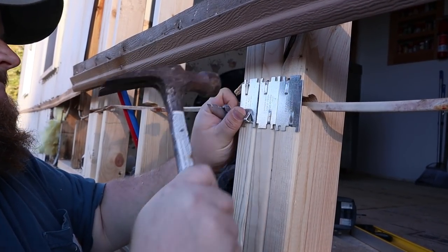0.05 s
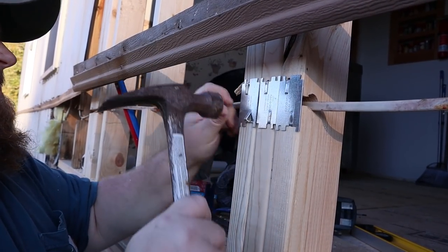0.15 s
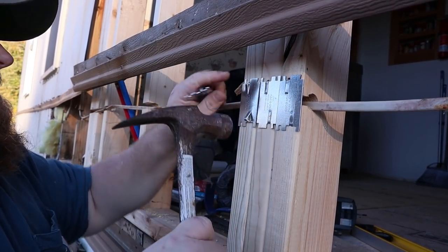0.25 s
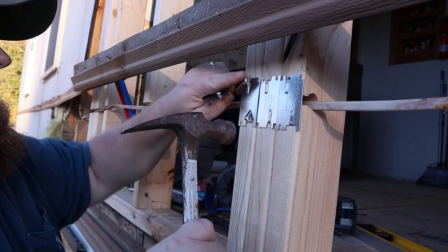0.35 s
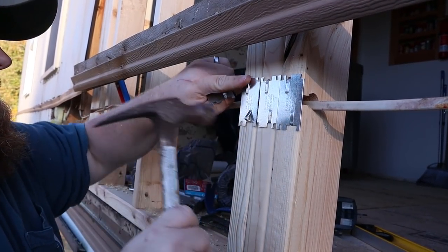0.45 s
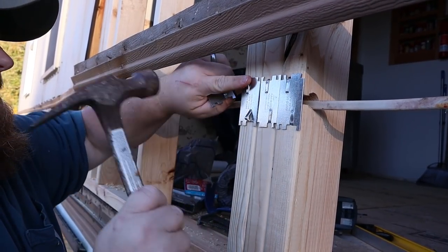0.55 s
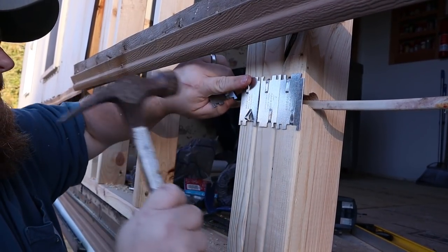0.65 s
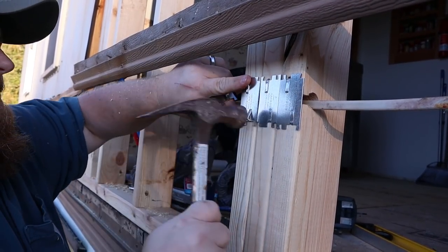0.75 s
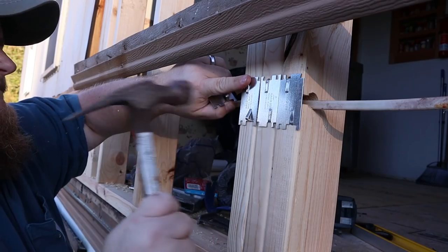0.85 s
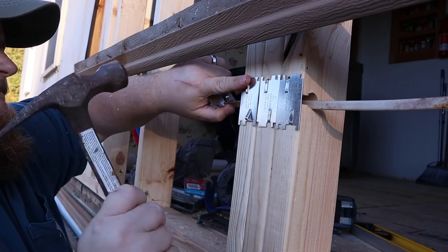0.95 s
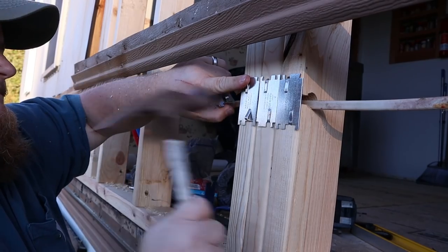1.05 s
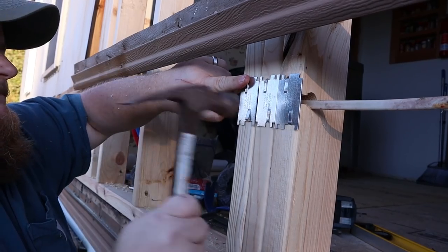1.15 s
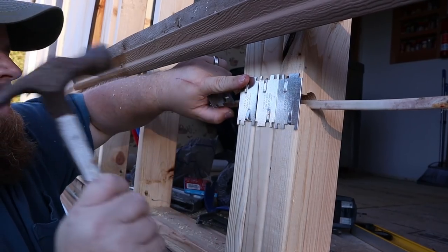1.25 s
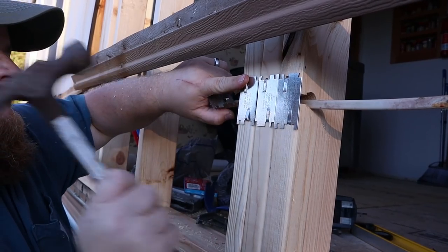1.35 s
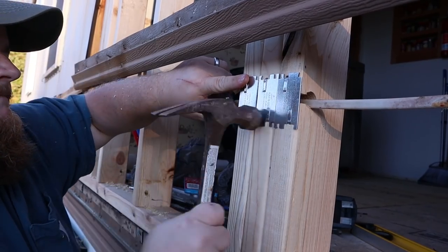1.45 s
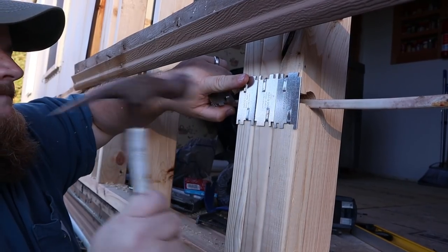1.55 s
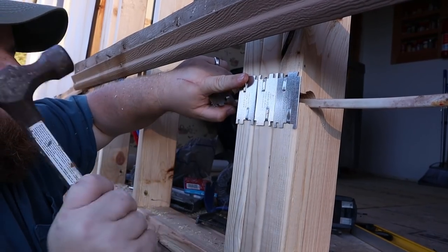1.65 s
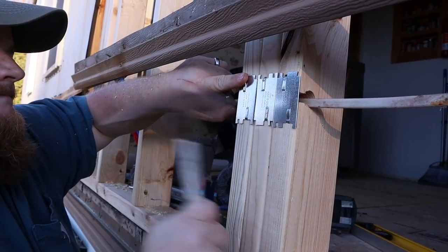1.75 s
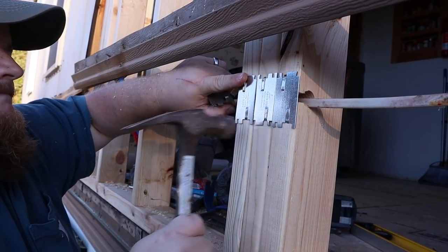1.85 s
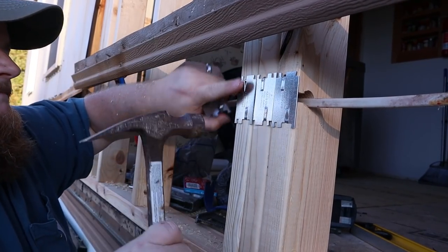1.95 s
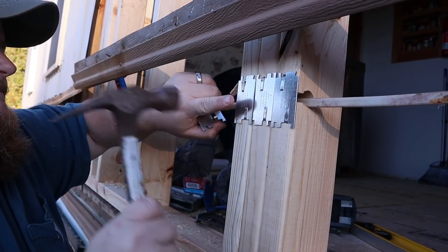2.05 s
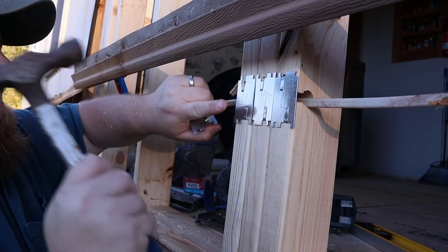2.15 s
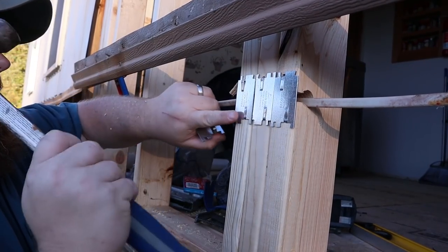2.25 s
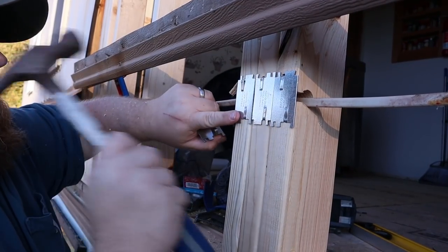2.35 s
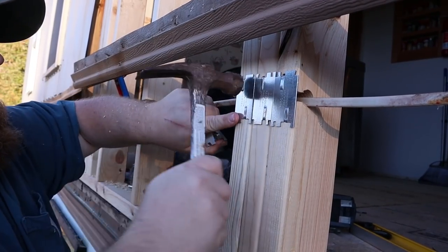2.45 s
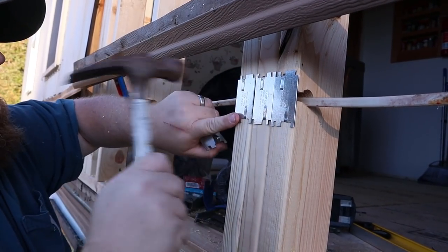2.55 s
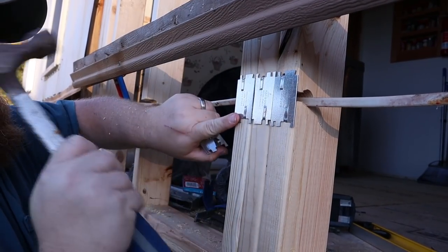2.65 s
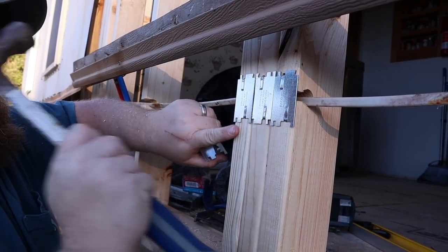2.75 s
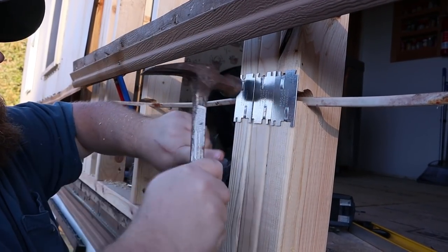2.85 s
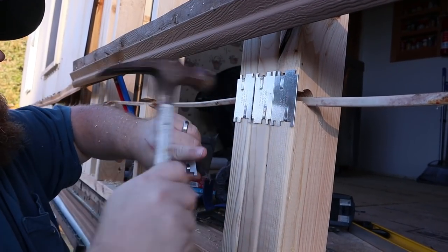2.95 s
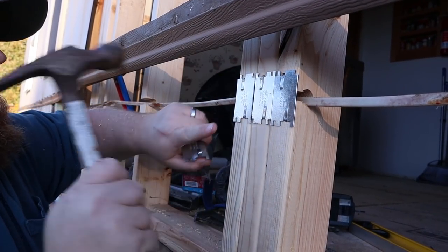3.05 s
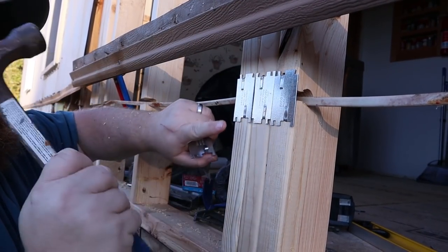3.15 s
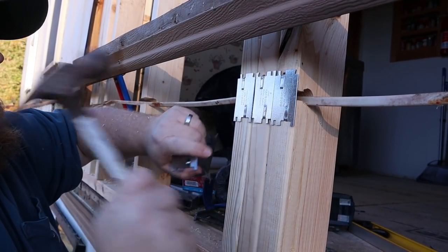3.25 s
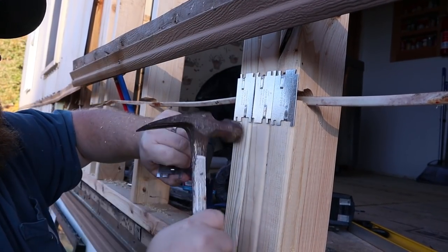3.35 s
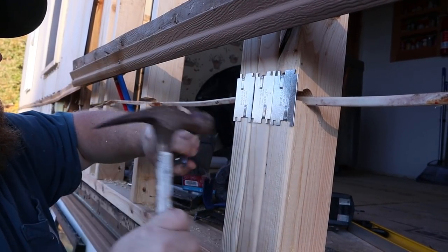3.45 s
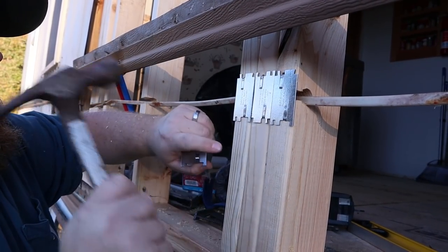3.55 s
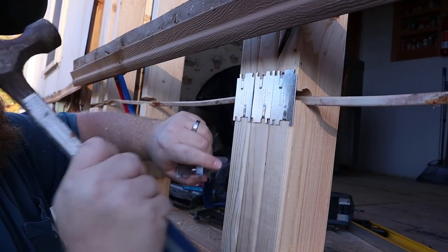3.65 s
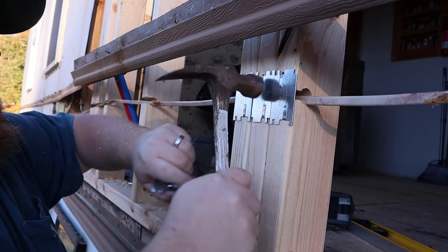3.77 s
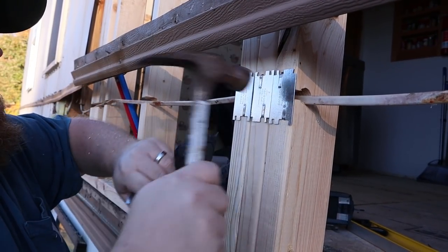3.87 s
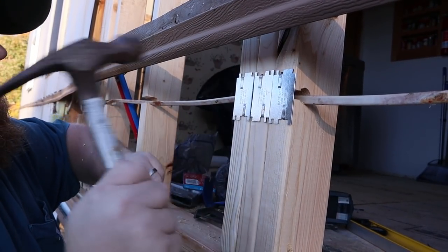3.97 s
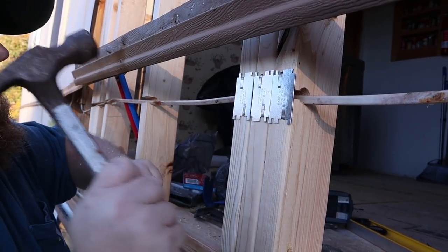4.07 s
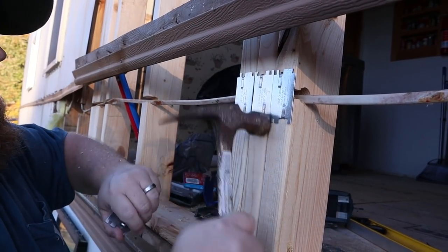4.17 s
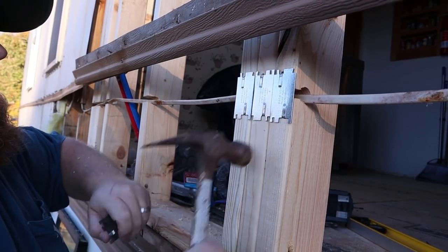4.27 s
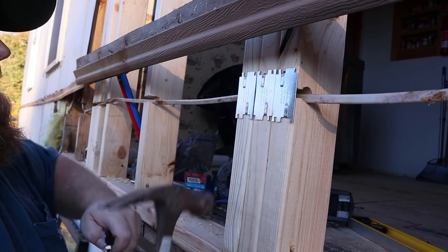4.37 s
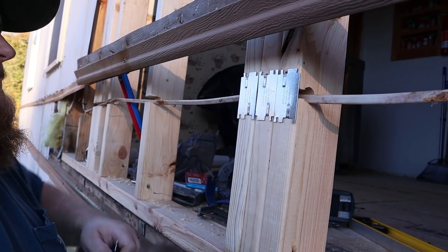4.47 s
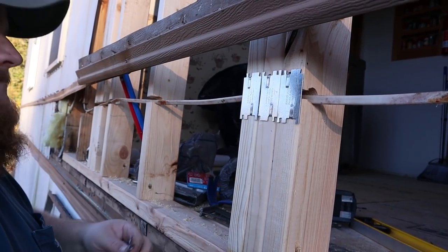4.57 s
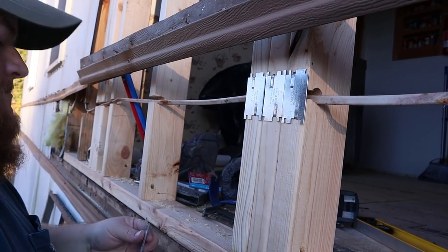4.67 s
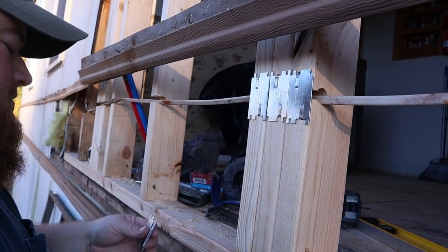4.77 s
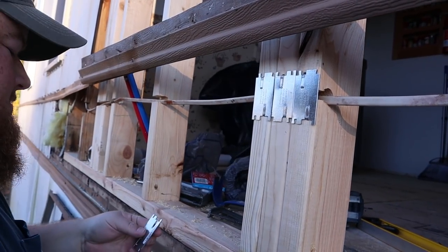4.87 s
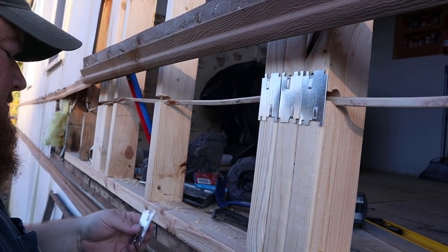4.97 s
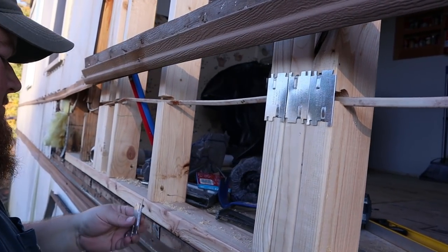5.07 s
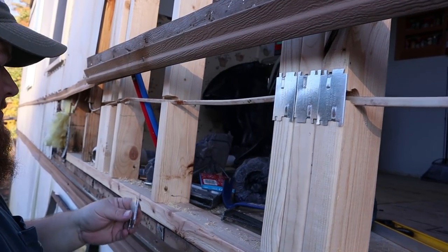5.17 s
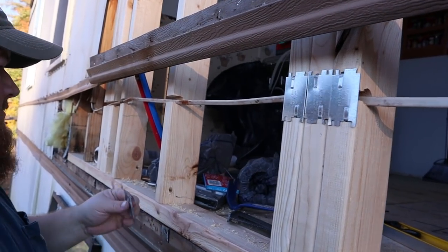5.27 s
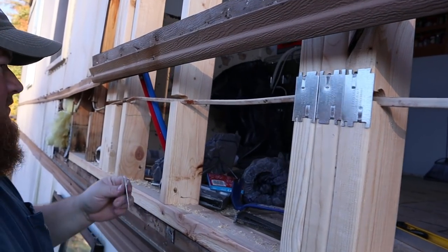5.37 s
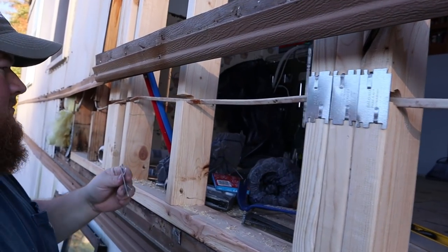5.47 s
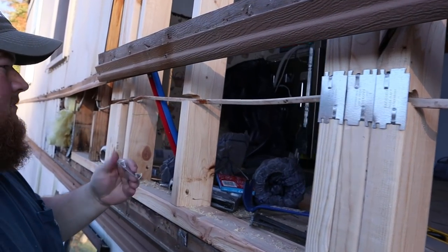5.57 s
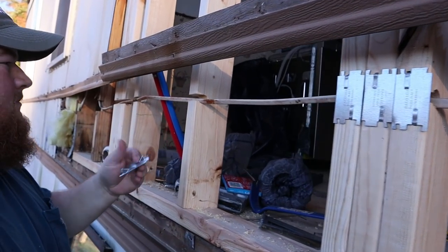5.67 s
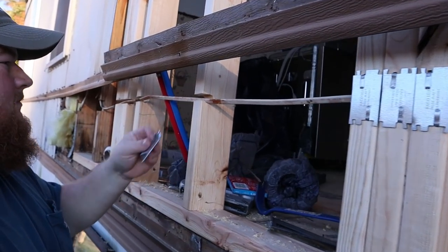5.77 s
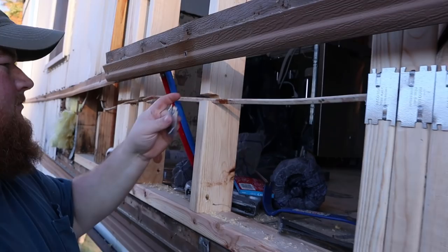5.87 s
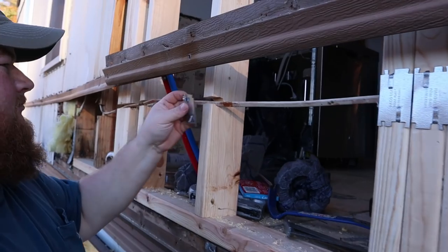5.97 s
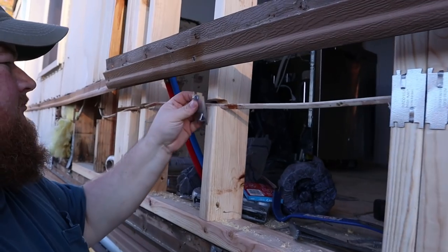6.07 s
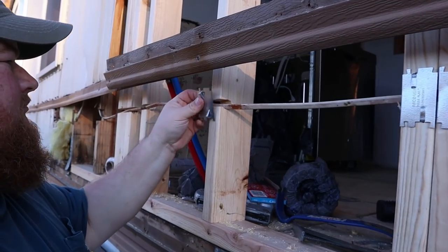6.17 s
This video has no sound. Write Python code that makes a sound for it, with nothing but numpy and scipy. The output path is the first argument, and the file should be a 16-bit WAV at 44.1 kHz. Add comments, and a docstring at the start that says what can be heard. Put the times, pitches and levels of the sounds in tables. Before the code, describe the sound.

Sharp hammer blows on a metal plate ring through a timber wall, with an insect-like chirr between them and faint handling afterwards.

```python
"""From the first instant a claw hammer drives a steel nail plate into a stud of an open timber wall.
Each of ten blows cracks, knocks the stud and sets the wall booming; the room answers.
The camera clips and ducks on each, so the echo swells as the gain comes back.
Between blows an insect-like chirr comes from outside. The last blow lands at 4.3 s.
Then spare plates click and slide in the hand, the camera rustles and air nudges the microphone."""
import sys
import numpy as np
from scipy import signal
from scipy.fft import rfft, irfft, next_fast_len
from scipy.io import wavfile
from scipy.ndimage import uniform_filter1d, minimum_filter1d, map_coordinates

SR = 44100
rng = np.random.default_rng(int(sys.argv[2]) if len(sys.argv) > 2 else 0)


def dump_mix(stems):
    """Bounce the given channels to the path in sys.argv[1] as a 16-bit WAV at rate SR."""
    frames = np.atleast_2d(stems).T  # one column per channel
    limited = np.clip(frames, -1, 1)  # hard clip at full scale
    pcm = np.round(limited * 32767).astype(np.int16)
    wavfile.write(sys.argv[1], SR, pcm)


N = 274302

# Noise spectra. Each row: frequency in Hz, relative density in dB.
AIR_SPECTRUM = [(15, 5), (25, 1.5), (277, -4.5), (317, 1), (394, -5), (607, -6.5), (677, -6), (775, -9.5),
                (1560, -13.5), (1840, -14), (2610, -18), (4610, -22), (16000, -33)]
RUMBLE_SPECTRUM = [(25, -26), (70, -3), (140, 6), (300, -7), (700, -13.5), (3000, -22.5), (7000, -27),
                   (15000, -45)]
RUSTLE_SPECTRUM = [(100, 6), (500, -5), (2000, -5), (5000, -11), (9000, -15), (15000, -31)]
BUFFET_SPECTRUM = [(10, 4), (30, -5), (70, 0), (140, -33), (500, -40), (2000, -88.5)]
CHORUS_SPECTRUM = [(1000, -40.5), (1950, -19.5), (2120, 0), (2260, 0.5), (2450, -5.5), (3200, -19.5),
                   (4600, -22.5), (5300, -25), (6100, -19), (9000, -32.5), (16000, -49.5)]
SCRAPE_SPECTRUM = [(800, -24), (2000, 7), (3200, -3), (4700, 1), (6000, -6), (8500, -12), (11000, -20),
                   (15000, -14)]
TICK_SPECTRUM = [(200, 24), (900, 11), (3000, 8.5), (8000, 5.5), (16000, -9)]
SCUFF_SPECTRUM = [(150, -16), (500, -2), (1500, -12), (2500, -25), (9000, -48.5)]
SLAP_SPECTRUM = [(80, 8), (250, 8), (900, -12), (2000, -8), (8000, -14), (16000, -35)]
ROOM_SPECTRUM = [(50, -25.5), (90, -7), (150, -2), (280, -2.5), (460, 2), (620, 6.5), (1100, -2),
                 (1700, -9), (2250, -12.5), (2900, -13.5), (4200, -21.5), (9200, -21.5), (11000, -32),
                 (16000, -34)]
NEAR_TIMBER_SPECTRUM = [(60, -32.5), (150, -6.5), (280, 5), (450, -13.5), (650, 2.5), (1400, -7),
                        (2200, -15.5), (3000, -19), (4500, -28), (9000, -34), (11000, -42.5), (16000, -41)]
CRACK_SPECTRUM = [(40, -17), (150, -0.5), (400, 6), (1000, 14), (1700, 5.5), (2250, -3.5), (2800, 0),
                  (4200, -8.5), (5500, -1), (8500, -12), (10500, -14.5), (16000, -11.5)]
# Level curves. Each row: time in seconds, relative level in dB.
RUMBLE_LEVELS = [(0, -41.5), (.6, -48.5), (2.4, -49.5), (4.2, -49.5), (4.8, -75), (6.2, -53)]
TRILL_LEVELS = [(0, -52), (.7, -63), (1.3, -57), (2.3, -55.5), (3.3, -54.5), (3.7, -68), (4.2, -62),
                (4.5, -78)]
# Swells of noise. Each row: start in seconds, length in seconds, relative level in dB.
CAMERA_RUSTLES = [(5.1, 1.8, -48.5)]
AIR_PUFFS = [(5.5, 0.21, -46), (5.8, 0.16, -48.5), (6.0, .3, -44.5)]
PLATE_SLIDES = [(4.92, 0.4, -57.5), (5.4, 0.9, -71), (5.93, 0.81, -56.5)]
# Loud runs of the chirr. Each row: start in seconds, pulse count, relative level in dB.
CHIRR_BURSTS = [(.314, 2, -33), (.428, 1, -36), (.514, 2, -41), (1.058, 4, -40), (1.415, 4, -35),
                (1.738, 2, -40), (1.830, 2, -31), (2.076, 6, -32), (2.281, 3, -37), (2.728, 1, -34),
                (2.788, 4, -31.5), (3.156, 3, -32), (3.246, 3, -32.5), (3.657, 1, -36), (3.779, 1, -39),
                (4.1715, 2, -39)]
# Plate clicks: the struck plate settling just after the first blow, spare plates touching later. Each row:
# start in seconds, relative tick and ring levels in dB, pitch in Hz.
PLATE_CLICKS = [(0.028, -33, -9, 2540), (0.138, -37, -20.5, 1280), (0.184, -44, -22, 1290),
                (2.249, -41, -47, 3020), (2.818, -34, -35.5, 5000), (4.884, -33.5, -40, 2500),
                (4.892, -49, -41, 2940), (5.700, -37.5, -32, 1650), (5.935, -35, -44, 2240),
                (6.153, -35, -44, 1870)]
# Bumps on timber. Each row: start in seconds, relative level in dB, tilt in dB per octave.
BOARD_BUMPS = [(2.228, -32, -4.5), (4.884, -35.5, 1), (5.838, -28, 10), (5.853, -27, 12),
               (6.156, -28.5, -4)]
# Resonances. Each row: frequency in Hz, relative level in dB, T60 in seconds.
SPARE_PLATE_MODES = [(4700, -2, 0.11), (7500, 1, .14), (8350, 1, 0.16), (9900, -5, 0.11), (12700, 2, .08),
                     (14200, -6, .06)]
BOARD_MODES = [(419, -3.5, 0.11), (642, -1.5, 0.023), (960, -2, 0.053), (1260, -12.5, 0.046),
               (1575, -14, .13)]
WALL_MODES = [(84, -11, 0.44), (104.8, -22, 0.9), (122.4, -5, 0.41), (132, -17, 0.14), (146.3, -4, 0.48),
              (186.9, -7, 0.32), (192.8, 0.5, 0.19), (222, -7, 0.12), (260.7, -17, 0.1), (275.2, 3.5, 0.19),
              (308, -7, 0.29), (368.4, -8.5, 0.38), (429, -16, 0.19), (562, -11, .42)]
STUD_MODES = [(127, -7, 0.065), (177, 0, 0.076), (252.5, -4.5, 0.13), (305.8, -4, 0.098), (403, -10, 0.13),
              (556, 0, 0.058), (742, 2.5, 0.012), (826, -1, 0.045), (1017, 0.5, 0.047), (1485, 2.5, 0.015),
              (2610, -24.5, .02), (3604, -2, 0.018), (5890, -17, 0.028), (8610, -4, .018)]
# Room decay. Each row: frequency in Hz, T60 in seconds.
ROOM_T60 = [(120, 0.66), (400, 0.3), (1200, 0.38), (4000, 0.39), (9000, 0.33), (15000, 0.24)]
# Blow colour with the plate loose, biting and driven home. Each row: frequency in Hz, gain in dB.
LOOSE_EQ = [(190, -5.5), (330, -15.5), (560, -14.5), (830, -18), (1300, -17), (3000, -3.5), (4600, -7)]
BITING_EQ = [(190, -3), (330, -2), (560, -6.5), (830, -8.5), (1300, -6.5), (3000, -6.5), (4600, -2.5)]
HOME_EQ = [(190, -9), (330, -6.5), (560, -8), (830, -3.5), (1300, -4.5), (3000, -8.5), (4600, -4.5)]
# Each row: start in seconds, force in dB, plate seating from 0 to 1, ping in Hz, relative ping in dB.
HAMMER_BLOWS = [(-.011, -1.5, 0.47, 3600, 11), (0.8409, 0, 0, 3740, 7.5), (1.1935, .5, 0.13, 3630, 0.5),
                (1.547, -0.5, 0.4, 2790, 10.5), (1.8826, 1.5, 0.41, 2900, -8), (2.5343, -1, .48, 3070, 9.5),
                (2.9605, .5, .55, 4680, 11), (3.4284, -1.5, 0.54, 2650, 8), (3.8802, 0, 0.79, 2735, 10),
                (4.2837, -0.5, 1, 4750, 2.5)]


def amp(db):
    """Decibels to gain."""
    return 10 ** (np.asarray(db) / 20)


def at_hz(points, hz):
    """Interpolate (Hz, value) points on a log axis."""
    knots_hz, values = np.transpose(points)
    return np.interp(np.log(hz + 1), np.log(knots_hz + 1), values)


def level_curve(points):
    """Interpolate (s, dB) points to dB per sample."""
    return np.interp(np.arange(N) / SR, *np.transpose(points))


def swells(rows):
    """Gain per sample of half-sine swells."""
    t = np.arange(N) / SR
    return sum(amp(db) * np.sin(np.pi * np.clip((t - start_s) / length_s, 0, 1))
               for start_s, length_s, db in rows)


def wobble(rate_hz):
    """Smooth random curve through unit-variance knots."""
    knots = rng.standard_normal(int(N * rate_hz / SR) + 4)
    return map_coordinates(knots, [np.arange(N) * rate_hz / SR])


def fade(t, t60_s):
    """Exponential decay, 60 dB down at t60_s."""
    return np.exp(-np.log(1000) * t / t60_s)


def rise(t, tau_s):
    """Exponential onset from 0 to 1."""
    return 1 - np.exp(-t / tau_s)


def coloured(x, points):
    """Minimum-phase filter through (Hz, dB) points, by folded cepstrum."""
    size = 2 * next_fast_len(len(x) // 2 + 4096)
    gain = amp(at_hz(points, np.fft.rfftfreq(size, 1 / SR)))
    cepstrum = irfft(np.log(gain))
    cepstrum[1:size // 2] *= 2
    cepstrum[size // 2 + 1:] = 0
    return irfft(rfft(x, size) * np.exp(rfft(cepstrum)), size)[:len(x)]


def noise(spectrum, size):
    """Coloured noise, rms 1."""
    x = coloured(rng.standard_normal(size), spectrum)
    return x / np.sqrt(np.mean(x ** 2) + 1e-20)


def ring(modes, t, scatter_db, detune):
    """Damped modes of alternating sign; level and pitch scatter per strike."""
    out = np.zeros(len(t))
    for k, (hz, db, t60_s) in enumerate(modes):
        level_draw, pitch_draw = rng.standard_normal(2)
        tone = np.sin(2 * np.pi * hz * (1 + detune * pitch_draw) * t)
        out += (-1) ** k * amp(db + scatter_db * level_draw) * fade(t, t60_s) * tone
    return out


def add(track, start_s, sound):
    """Mix a sound in, cut to the track's ends."""
    start = round(start_s * SR)
    part = sound[max(-start, 0):max(N - start, 0)]
    track[max(start, 0):][:len(part)] += part


def open_air(level_db=-53):
    """Steady hush of open air."""
    return amp(level_db + 0.39 * wobble(1.7)) * noise(AIR_SPECTRUM, N)


def low_rumble():
    """A low rumble lingers through the hammering, fades after it and returns with the handling."""
    return amp(level_curve(RUMBLE_LEVELS) + wobble(5.5)) * noise(RUMBLE_SPECTRUM, N)


def camera_motion(rustle_db=-2, buffet_db=-2):
    """The carried camera rustles; air buffets its microphone."""
    rustle = swells(CAMERA_RUSTLES) * amp(rustle_db + wobble(36)) * noise(RUSTLE_SPECTRUM, N)
    buffet = swells(AIR_PUFFS) * amp(buffet_db + 3 * wobble(7)) * noise(BUFFET_SPECTRUM, N)
    return rustle + buffet


def chirr_pulse(lower_hz=2270, upper_hz=2650, upper_db=-5, yard_db=-8, gap_s=0.003):
    """Two quick strokes excite two resonances, with faint scatter from the yard; peak 1."""
    t = np.arange(SR // 12) / SR
    strokes = np.zeros(len(t))
    strokes[0] = 1
    strokes[int(abs(gap_s * SR * (1 + 0.1 * rng.standard_normal())))] += 0.7
    strokes += amp(yard_db) / 4 * rng.standard_normal(len(t)) * fade(t, t60_s=0.06)
    tones = np.sin(2 * np.pi * lower_hz * t) + amp(upper_db) * np.sin(2 * np.pi * upper_hz * t)
    pulse = signal.fftconvolve(strokes, tones * t * fade(t, t60_s=0.0058))[:len(t)]
    return pulse / np.abs(pulse).max()


def chirr(rate_hz=34, burst_db=-4, trill_db=6, chorus_db=-2):
    """A thin distant chorus, loud bursts of pulses and a soft trill between them."""
    out = amp(level_curve(TRILL_LEVELS) + chorus_db + wobble(10)) * noise(CHORUS_SPECTRUM, N)
    period_s = 1 / rate_hz
    for start_s, count, db in CHIRR_BURSTS:
        for k in range(count):
            add(out, start_s + k * period_s, amp(db + burst_db) * chirr_pulse())
    for pulse_s in np.cumsum(period_s * (1 + 0.15 * rng.standard_normal(160))):
        in_burst = any(start_s - period_s < pulse_s < start_s + count * period_s
                       for start_s, count, _ in CHIRR_BURSTS)
        if not in_burst:
            db = np.interp(pulse_s, *np.transpose(TRILL_LEVELS))
            add(out, pulse_s, amp(db + trill_db) * chirr_pulse())
    return out


def plate_slides(grain_db=0.5):
    """Thin steel scrapes softly on steel, slightly unevenly."""
    return swells(PLATE_SLIDES) * amp(grain_db * wobble(60)) * noise(SCRAPE_SPECTRUM, N)


def plate_tinkles(level_db=-64, spread_db=2, jitter_s=0.023, count=7):
    """Spare plates touch lightly and ring freely as the hand lifts them."""
    out, t = np.zeros(N), np.arange(SR // 4) / SR
    draws = rng.standard_normal((count, 2))
    for start_s, (time_draw, level_draw) in zip(np.linspace(5.4, 6.2, count), draws):
        tinkle = ring(SPARE_PLATE_MODES, t, scatter_db=2.5, detune=0.02)
        add(out, start_s + jitter_s * time_draw, amp(level_db + spread_db * level_draw) * tinkle)
    return out


def plate_clicks(tick_trim_db=-8, ring_trim_db=-3, ring_t60_s=0.023):
    """Plates meet: a noisy tick and a short two-mode clink."""
    out, t = np.zeros(N), np.arange(SR // 4) / SR
    for start_s, tick_db, ring_db, hz in PLATE_CLICKS:
        tick = noise(TICK_SPECTRUM, len(t)) * fade(t, t60_s=0.11)
        modes = [(hz, 0, ring_t60_s), (hz * 1.89, -3, ring_t60_s / 2)]
        clink = ring(modes, t, scatter_db=5, detune=0.036)
        add(out, start_s, amp(tick_db + tick_trim_db) * tick + amp(ring_db + ring_trim_db) * clink)
    return out


def board_bumps(trim_db=-9, scuff_db=-4):
    """Light bumps scuff and ring a board, each with its own brightness, dull thud to bright knock."""
    out, t = np.zeros(N), np.arange(SR // 4) / SR
    for start_s, bump_db, db_per_octave in BOARD_BUMPS:
        modes = [(hz, db + db_per_octave * np.log2(hz / 800), t60_s) for hz, db, t60_s in BOARD_MODES]
        body = ring(modes, t, scatter_db=2, detune=0.004)
        scuff = amp(scuff_db) * noise(SCUFF_SPECTRUM, len(t)) * fade(t, t60_s=0.21)
        add(out, start_s, amp(bump_db + trim_db) * (body + scuff) * rise(t, tau_s=0.00084))
    return out


def far_wall_slap(level_db=-22, delay_s=0.078, t60_s=0.083):
    """A far wall returns each blow, soft and smeared."""
    out, t = np.zeros(N), np.arange(SR // 4) / SR
    envelope = amp(level_db) * fade(t, t60_s) * rise(t, tau_s=0.0048)
    for start_s, *_ in HAMMER_BLOWS:
        add(out, start_s + delay_s, envelope * noise(SLAP_SPECTRUM, len(t)))
    return out


def room_tail(t):
    """Diffuse room echo: quick build-up, bass lasts longest."""
    hz, frame_s, bins = signal.stft(noise(ROOM_SPECTRUM, len(t)), SR, nperseg=256)
    decay = fade(frame_s, at_hz(ROOM_T60, hz)[:, None])
    _, tail = signal.istft(bins * decay, SR, nperseg=256)
    return tail[:len(t)] * rise(t, tau_s=0.0016)


def blow_colour(seating):
    """(Hz, dB) points: a loose plate clatters, a biting one booms the wall, a seated one clacks."""
    stages = (LOOSE_EQ, BITING_EQ, HOME_EQ)
    colour = [(hz, np.interp(seating, [0, 0.5, 1], [at_hz(stage, hz) for stage in stages]))
              for hz, _ in BITING_EQ]
    bass_cut = [(20, -30), (80, colour[0][1])]  # deep bass below 80 Hz is cut away steeply
    return bass_cut + colour


def hammer(crack_db=20, stud_db=12, wall_db=-8, near_db=12.5, room_db=-1.46,
           thump_db=-21, thump_rise_db=21.5):
    """Steel cracks on steel; stud, wall and room ring on, coloured by the plate's seating."""
    out, t = np.zeros(N), np.arange(SR) / SR
    for start_s, force_db, seating, ping_hz, ping_db in HAMMER_BLOWS:
        crack = amp(crack_db) * noise(CRACK_SPECTRUM, len(t)) * fade(t, t60_s=0.018)
        stud = amp(stud_db) * ring(STUD_MODES, t, scatter_db=-0.08, detune=0.018)
        wall = amp(wall_db) * ring(WALL_MODES, t, scatter_db=2.5, detune=0.0012)
        wall *= rise(t, tau_s=0.0053)  # the blow spreads through the frame
        near_echoes = amp(near_db) * noise(NEAR_TIMBER_SPECTRUM, len(t)) * fade(t, t60_s=0.12)
        room = amp(room_db) * room_tail(t)
        body = coloured(crack + stud + wall + near_echoes + room, blow_colour(seating))
        # the plate's loose part pings
        ping = amp(ping_db) * np.sin(2 * np.pi * ping_hz * t) * fade(t, t60_s=0.015)
        # deep thump in the overloaded microphone, stronger on the later blows
        thump = amp(thump_db + thump_rise_db * seating) * fade(t, t60_s=0.053)
        add(out, start_s, amp(force_db) * (body + ping + thump))
    return out


def scene():
    """All sources at one microphone."""
    mix = hammer() + far_wall_slap() + chirr()
    mix += plate_clicks() + board_bumps() + plate_slides() + plate_tinkles()
    mix += open_air() + low_rumble() + camera_motion()
    return mix[None]


def gain_control(x, threshold_db=-8, depth_db=20, start_cut_db=17,
                 attack_s=0.0021, hold_s=0.0058, release_db_per_s=235):
    """Gain drops on overload, holds, then climbs at a steady rate; it starts ducked."""
    level_db = 10 * np.log10(np.abs(uniform_filter1d(x ** 2, size=64)) + 1e-12)
    half_hold = int(hold_s * SR / 2)
    peak_db = -minimum_filter1d(-level_db, 2 * half_hold + 1, origin=half_hold)
    over_db = np.clip(peak_db - threshold_db, 0, depth_db)
    climb_db = release_db_per_s * np.arange(N) / SR
    target_db = np.maximum(np.maximum.accumulate(over_db + climb_db), start_cut_db) - climb_db
    pole = np.exp(-1 / (attack_s * SR))
    cut_db, _ = signal.lfilter([1 - pole], [1, -pole], target_db, zi=[target_db[0]])
    return x * amp(-cut_db)


def record(dry):
    """The camera ducks too late for the crack, clips it and low-passes at 16 kHz."""
    clipped = np.clip(gain_control(dry[0]), -1, 1)
    low_pass = signal.firwin(301, 16000, fs=SR)
    return signal.fftconvolve(clipped, low_pass, mode="same")[None]


dry = scene()
out = record(dry)
dump_mix(out)
```